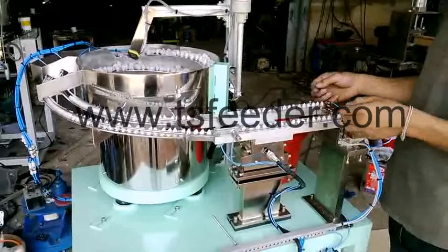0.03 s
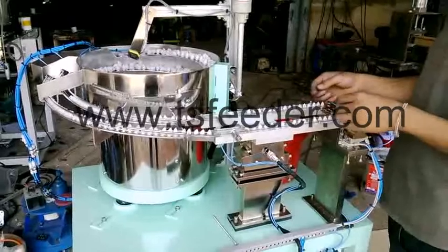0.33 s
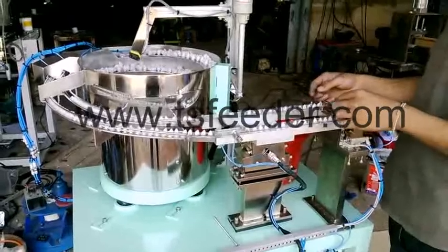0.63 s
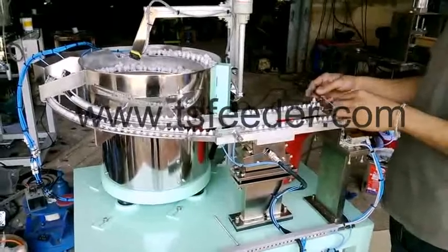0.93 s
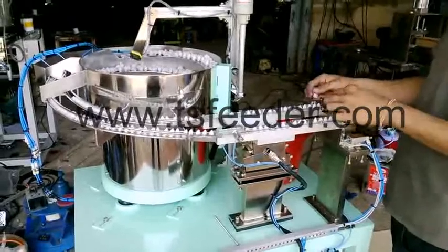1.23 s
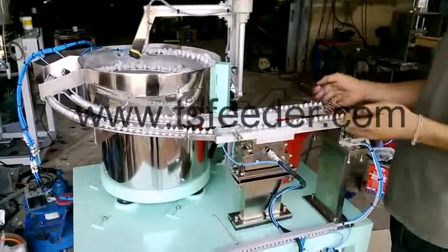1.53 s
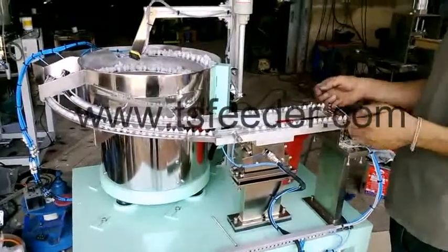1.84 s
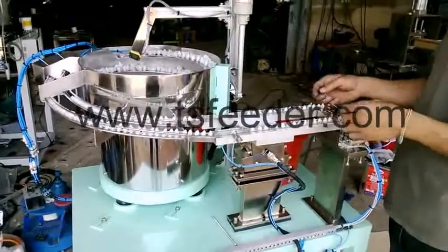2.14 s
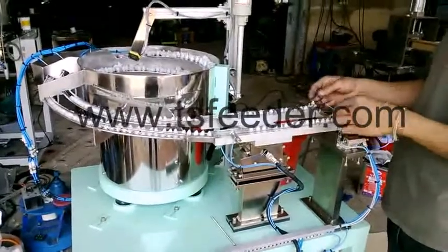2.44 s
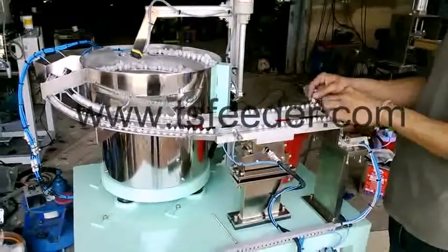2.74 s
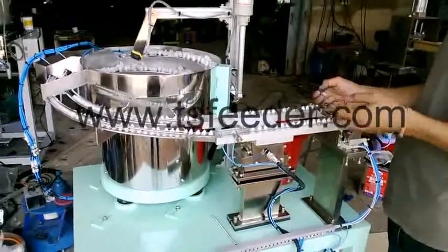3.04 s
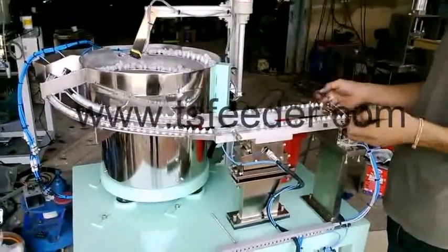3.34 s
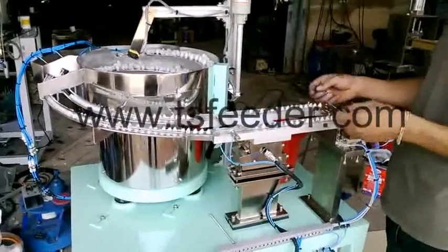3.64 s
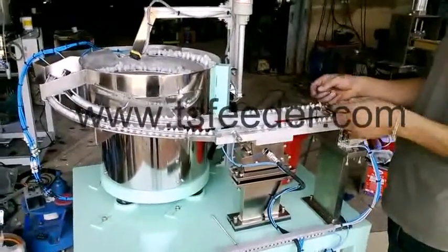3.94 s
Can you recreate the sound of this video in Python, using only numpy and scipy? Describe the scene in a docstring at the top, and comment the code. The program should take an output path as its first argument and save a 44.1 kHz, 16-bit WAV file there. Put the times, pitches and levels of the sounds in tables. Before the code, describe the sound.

A pneumatic feeder machine hisses and clacks nearby in a workshop. Sharp air bursts at 0.3 and 2.3 seconds each hiss briefly and end in a dull thud. The vibrating bowl buzzes with chattering parts from 0.4 to 1.7 and 2.5 to 3.3 seconds, each run ending in a puff, a steel clang and a light knock. Another burst comes at 3.9. A soft fluttering hiss and low rumble continue throughout.

```python
"""A vibratory bowl feeder runs twice, forced by its coil to buzz at twice the mains rate as parts chatter.
An air cylinder at the end of its track strokes out with a turbulent blast and a long hiss, thuds at its
stop, and later snaps back, exciting the modes of a steel slide with a clang.
A continuous air jet hisses, swelling and fluttering, over the low rumble of the workshop."""
import sys
import numpy as np
from scipy import signal
from scipy.fft import rfft, irfft
from scipy.io import wavfile

SR = 44100
rng = np.random.default_rng(int(sys.argv[2]) if len(sys.argv) > 2 else 0)


def bounce(signal):
    """Save signal as a 16-bit WAV file at the path given by the first command-line argument."""
    frames = np.transpose(np.atleast_2d(signal))
    limited = np.clip(frames, -1, 1)
    pcm = np.round(limited * 32767).astype(np.int16)
    wavfile.write(sys.argv[1], SR, pcm)


N = 176400
T = np.arange(N) / SR

# Feeder runs: on t/s, off t/s, level/dB
FEEDER_RUNS = [(0.395, 1.683, -4.5), (2.46, 3.33, -2)]
# Partials of the bowl: harmonic number, level/dB
BOWL_PARTIALS = [(1, -38.5), (2, -42.3), (3, -61), (4, -57), (5, -63), (21, -60), (23, -60), (25, -56),
                 (27, -54), (29, -52), (30, -59), (31, -60), (32, -49), (33, -49), (34, -58), (36, -55),
                 (37, -57), (45, -56)]
# Parts chattering on the track (every spectrum is a relative density): f/Hz, level/dB
CHATTER_SPECTRUM = [(150, -14), (350, 3.5), (800, -11), (1800, -6), (2400, -1.5), (3900, -1), (5200, -1),
                    (7000, -22), (10000, -57), (14000, -57)]

# Outward strokes: t/s, blast level/dB, hiss level/dB, thud level/dB
OUTWARD_STROKES = [(0.258, -22, -34.5, -28), (2.324, -21, -32.5, -27.5), (3.905, -18.5, -32.5, -30)]
# Click of the valve: f/Hz, level/dB
CLICK_SPECTRUM = [(150, -10), (900, 18), (2000, -19), (4000, 10), (12000, -33)]
# Air leaving the valve: f/Hz, level/dB
BLAST_SPECTRUM = [(200, -36), (500, -26), (1000, -19), (2000, -10), (3500, -5), (5000, -3.5), (7200, 3),
                  (8500, -4), (10000, -17.5), (11000, -22.5), (12500, -29), (14000, -40)]
# Resonances of the valve body: f/Hz, width/Hz, level/dB
VALVE_PEAKS = [(5650, 90, 5), (6830, 70, 7), (7030, 70, 9), (7515, 60, 8), (7843, 60, 7)]
# Exhaust hiss: f/Hz, level/dB
EXHAUST_SPECTRUM = [(300, -16), (1000, -25), (1600, -9.5), (2700, -6), (3600, -7.5), (4500, -2), (6500, -1),
                    (7600, -4), (9000, -11), (11000, -25), (12500, -30), (14000, -46)]
# Resonances and dips of the exhaust port: f/Hz, width/Hz, level/dB
PORT_PEAKS = [(2780, 120, 4), (4130, 90, -4), (4385, 80, 5), (4820, 90, -3), (5040, 80, 5.5), (5250, 60, 4),
              (5650, 80, 11), (6020, 70, 3), (7030, 60, 3), (7960, 100, -5)]
# Piston at its end stop: f/Hz, level/dB
THUD_SPECTRUM = [(40, -15), (120, -21), (180, 4), (280, -5.5), (400, -1), (560, -17.5), (720, -13),
                 (880, -17.5), (1160, -12.5), (1500, -29), (6000, -51)]
# Boom of the table under the piston: f/Hz, width/Hz, level/dB
TABLE_PEAKS = [(186, 32, 4.5)]

# Return strokes: t/s, blast level/dB, clang level/dB, hiss level/dB
RETURN_STROKES = [(1.637, -23, -18.5, -32), (3.2979, -23.5, -17.5, -28)]
# Blows of the slide as it rattles home: t/s after the first, level/dB
RATTLE_BLOWS = [(0, 0), (.0073, 0), (0.015, -7), (0.022, -16)]
# Crash of the slide: f/Hz, level/dB
CRASH_SPECTRUM = [(200, -14), (700, -10), (1100, -1), (1900, -9.5), (2700, 7.5), (3700, -2), (5200, 10.5),
                  (6500, 3), (8000, -36), (10500, -50), (14000, -51)]
# Pitch of the exhaust whistle: t/s from its onset, f/Hz
WHISTLE_PITCH = [(0, 8780), (.04, 8820), (.12, 9250), (.155, 9230), (.18, 8700), (.205, 7000)]
# Modes of the steel slide: f/Hz, level/dB, T60/s
STEEL_MODES = [(1055, -4, .16), (1152, -3.5, .16), (1660, -14, .13), (1865, -17, .2), (2130, -13, .18),
               (2245, -9.5, .21), (2623, -1, .22), (2680, -9, .12), (2845, -8, .15), (3300, -5, .14),
               (4322, -10, .17), (4960, -7, .16), (5515, -4, .2), (6040, -9, .22)]
# Knocks as the slide settles: t/s, level/dB
SETTLING_KNOCKS = [(1.9165, -32.5), (1.925, -32.5), (3.577, -28), (3.588, -31)]
# Scuff of a knock: f/Hz, level/dB
KNOCK_SPECTRUM = [(60, -4), (180, -0.5), (370, 2.5), (600, 0.5), (780, -5), (900, -10), (2600, -14),
                  (5000, -26), (12000, -55)]
# Hollow modes of the frame: f/Hz, level/dB, T60/s
FRAME_MODES = [(365, -15, 0.04), (505, -11, 0.043), (708, -16.5, 0.087)]
# Small parts tapping on the track: t/s, level/dB
PART_TAPS = [(3.579, -49), (3.598, -34.5)]
# Modes of those parts: f/Hz, level/dB, T60/s
PART_MODES = [(2280, -4, 0.054), (2780, -3, 0.043)]
# A faint metallic note: t/s, f/Hz, level/dB, decay time/s
FAINT_NOTE = (.11, 2085, -48, .12)

# Swells of the air jet: t/s, level/dB
JET_SWELLS = [(.1, -42.5), (.62, -40.5), (.86, -44.5), (.97, -37.5), (1.07, -43), (1.16, -40), (1.26, -44),
              (1.36, -40.5), (1.47, -43.5), (1.6, -39), (1.99, -38), (2.12, -44), (2.2, -36.5),
              (2.28, -38.5), (2.75, -39.5), (2.88, -38.5), (3.13, -41), (3.205, -31.5), (3.26, -37.5),
              (3.32, -32), (3.53, -35.5), (3.61, -39.5), (3.76, -34), (3.86, -40.5), (4, -26.5)]
# Hiss of the jet: f/Hz, level/dB
JET_SPECTRUM = [(500, -7), (1500, -7.5), (2300, -4), (3200, -2), (4400, 1), (5800, 3.5), (7500, -2.5),
                (9000, -10.5), (10000, -16), (11000, -28.5), (12500, -27), (14000, -47)]
# Wash of the workshop: f/Hz, level/dB
WASH_SPECTRUM = [(30, -2.5), (110, -2.5), (200, -8.5), (300, -9.5), (600, -19.5), (1200, -13.5),
                 (2200, -19), (5000, -14), (14000, -66)]
# Deep rumble: f/Hz, level/dB
RUMBLE_SPECTRUM = [(24, -9.5), (36, 3), (50, -9), (75, -4), (200, -20.5), (600, -72)]
# Swells of the rumble: t/s, level/dB
RUMBLE_SWELLS = [(.1, -45.5), (.7, -36), (1.2, -43), (2.2, -47.5), (2.8, -39), (3.3, -39.5), (4, -46.5)]
# Soft low bumps: t/s, level/dB
LOW_BUMPS = [(0.442, -23.5), (0.48, -19.5), (0.79, -25)]
# Scuff of a bump: f/Hz, level/dB
BUMP_SPECTRUM = [(15, 6), (35, -7), (62, 13), (110, -6.5), (190, -3), (400, -34), (2000, -67)]

CLANG_DELAY_S = 0.0104  # from the return blast to the slide's first blow


def feeder(coil_hz=120.9, spin_up_s=0.15, run_down_s=0.055, buzz_db=2, chatter_db=-40.5):
    """Forced vibration: the coil drives the bowl in harmonics, and the parts chatter once a cycle."""
    drive = sum(amp(db) * swell(on, spin_up_s, run_down_s, hold=off - on - spin_up_s)
                for on, off, db in FEEDER_RUNS)
    phase = 2 * np.pi * coil_hz * T
    buzz = np.zeros(N)
    for harmonic, db in BOWL_PARTIALS:
        waver = 1 + 0.15 * drift(36)
        buzz += amp(db) * waver * np.sin(harmonic * phase + 2 * np.pi * rng.random())
    chatter = unit(noise(CHATTER_SPECTRUM) * (1 + 0.3 * np.cos(phase)))
    return drive * (amp(buzz_db) * np.sqrt(2) * buzz + amp(chatter_db) * chatter)


def outward_strokes(opening_s=0.0038, travel_s=0.307, click_db=-25, rebound_s=0.034, rebound_db=-9.5):
    """Turbulence and impact: the valve clicks and vents, and air hisses until the piston thuds home."""
    click, blast = noise(CLICK_SPECTRUM), noise(BLAST_SPECTRUM, VALVE_PEAKS)
    hiss, thud = noise(EXHAUST_SPECTRUM, PORT_PEAKS), noise(THUD_SPECTRUM, TABLE_PEAKS)
    thud_rise_s, thud_fall_s = 0.012, 0.026
    out = np.zeros(N)
    for start, blast_db, hiss_db, thud_db in OUTWARD_STROKES:
        out += amp(click_db) * click * swell(start, rise=0.0013, fall=0.0011)
        out += amp(blast_db) * blast * swell(start, opening_s, fall=0.027)
        flow = swell(start, opening_s, fall=0.057, hold=travel_s)
        surge = 2.1 * swell(start, opening_s, fall=0.043)
        out += amp(hiss_db) * hiss * (flow + surge)
        stop = start + travel_s - thud_rise_s / 2
        impact = swell(stop, thud_rise_s, thud_fall_s)
        rebound = amp(rebound_db) * swell(stop + rebound_s, thud_rise_s, thud_fall_s)
        out += amp(thud_db) * thud * (impact + rebound)
    return out


def return_strokes(opening_s=0.00099, travel_s=0.22, whistle_delay_s=0.075):
    """Transient discharge: a puff of air, the slide's rattling crash, and a fading, whistling hiss."""
    blast, crash = noise(BLAST_SPECTRUM, VALVE_PEAKS), noise(CRASH_SPECTRUM)
    hiss = noise(EXHAUST_SPECTRUM, PORT_PEAKS)
    out = np.zeros(N)
    for start, blast_db, clang_db, hiss_db in RETURN_STROKES:
        out += amp(blast_db) * blast * swell(start, opening_s, fall=0.017)
        for lag, db in RATTLE_BLOWS:
            blow = swell(start + CLANG_DELAY_S + lag, rise=0.00058, fall=0.0048)
            out += amp(clang_db + db) * crash * blow
        cutoff = swell(start, opening_s, fall=0.014, hold=travel_s)
        out += amp(hiss_db) * hiss * swell(start, opening_s, fall=0.085) * cutoff
        out += whistle(start + whistle_delay_s)
    return out


def whistle(start, length_s=0.205, clean_s=0.075, level_db=-47, jitter_hz=60, rough_hz=380):
    """Flow tone: a thin exhaust whistle rises, breaks into turbulence, then drops as the pressure goes."""
    age = np.clip(T - start, 0, length_s)
    breakup = np.clip(age / clean_s - 1, 0, 0.5) * 2
    hz = np.interp(age, *np.transpose(WHISTLE_PITCH)) + (jitter_hz + rough_hz * breakup) * drift(700)
    phase = 2 * np.pi * np.cumsum(hz) / SR
    arch = abs(np.sin(np.pi * age / length_s)) ** 0.3
    return amp(level_db - 4 * breakup) * arch * np.sin(phase)


def slide(ring_db=-11.5, scuff_db=-11.5):
    """Impact excitation: the slide rings on each return, then settles with hollow knocks; parts tap."""
    strikes = [(start + CLANG_DELAY_S, clang_db + ring_db) for start, _, clang_db, _ in RETURN_STROKES]
    knocks = sum(amp(db) * swell(start, rise=0.0055, fall=0.03) for start, db in SETTLING_KNOCKS)
    scuff = amp(scuff_db) * noise(KNOCK_SPECTRUM) * knocks
    steel = ring(strikes, STEEL_MODES, rise=0.01)
    frame = ring(SETTLING_KNOCKS, FRAME_MODES, rise=0.01)
    parts = ring(PART_TAPS, PART_MODES, rise=0.00085)
    return steel + frame + scuff + parts


def ring(strikes, modes, rise, roughness=0.22):
    """Modal superposition: each mode of a struck part decays exponentially with a rough flutter."""
    out = np.zeros(N)
    for hz, db, t60 in modes:
        envelope = sum(amp(db + hit_db) * swell(start, rise, t60 / np.log(1000))
                       for start, hit_db in strikes)
        flutter = 1 + roughness * drift(170)
        out += np.sqrt(2) * envelope * flutter * np.sin(2 * np.pi * (hz * T + rng.random()))
    return out


def faint_note(jitter_hz=12):
    """Damped oscillation: a faint metallic note sounds before the first stroke."""
    start, hz, db, fall = FAINT_NOTE
    phase = 2 * np.pi * np.cumsum(hz + jitter_hz * drift(86)) / SR
    return amp(db) * swell(start, 0.019, fall) * np.sin(phase)


def air_jet(flutter_db=1.5):
    """Jet turbulence: a continuous broadband hiss swells and flutters."""
    hiss = early_reflections(noise(JET_SPECTRUM))
    level_db = np.interp(T, *np.transpose(JET_SWELLS)) + flutter_db * drift(16)
    return hiss * amp(level_db)


def workshop(wash_db=-48.5, bump_hz=56, scuff_db=-2.5):
    """Ambient noise: a broad wash and a deep rumble, with a few heavily damped low bumps."""
    scuff = amp(scuff_db) * noise(BUMP_SPECTRUM)
    bumps = np.zeros(N)
    for start, db in LOW_BUMPS:
        tone = np.sin(2 * np.pi * bump_hz * (T - start))
        bumps += amp(db) * swell(start, rise=0.0119, fall=0.014) * (scuff - tone)
    wash = amp(wash_db) * early_reflections(noise(WASH_SPECTRUM))
    rumble = noise(RUMBLE_SPECTRUM) * amp(np.interp(T, *np.transpose(RUMBLE_SWELLS)))
    return wash + rumble + bumps


def early_reflections(x, count=12, level_db=-11):
    """Comb filtering: echoes from the table and bowl, within 10 ms, give a hiss its hollow colour."""
    echoes = np.zeros(SR // 100)
    echoes[rng.integers(20, len(echoes), size=count)] = rng.choice([-1, 1], size=count)
    return unit(x + amp(level_db) * signal.fftconvolve(x, echoes / np.linalg.norm(echoes))[:N])


def room(x, t60_s=0.3, echoes_per_s=2000, level_db=-11):
    """Reverberation: sparse reflections die away exponentially."""
    t = T[:SR // 2]
    echoes = rng.standard_normal(len(t)) * (rng.random(len(t)) < echoes_per_s / SR)
    echoes *= (t > 0.003) * amp(-60 * t / t60_s)
    return amp(level_db) * signal.fftconvolve(x, echoes / np.linalg.norm(echoes))[:N]


def noise(spectrum, peaks=()):
    """Spectral shaping: noise of rms 1 with a broad contour and optional narrow peaks or dips."""
    hz = np.fft.rfftfreq(N, 1 / SR)
    knot_hz, knot_db = np.transpose(spectrum)
    db = np.interp(np.log(hz + 1), np.log(knot_hz), knot_db)
    for centre, width, lift in peaks:
        db += lift / (1 + (2 * (hz - centre) / width) ** 2)
    return unit(irfft(rfft(rng.standard_normal(N)) * amp(db), N))


def drift(bandwidth_hz):
    """Random modulation: low-pass noise of mean 0 and rms 1."""
    hz = np.fft.rfftfreq(N, 1 / SR)
    lowpass = np.exp(-(hz / bandwidth_hz) ** 2) * (hz > 0)
    return unit(irfft(rfft(rng.standard_normal(N)) * lowpass, N))


def swell(start, rise, fall, hold=0):
    """Exponential decay with time constant `fall`, after a linear rise and a hold; times in seconds."""
    return np.clip((T - start) / rise, 0, 1) * np.exp(-np.maximum(T - start - rise - hold, 0) / fall)


def amp(db):
    """Amplitude ratio of a level in decibels."""
    return 10 ** (np.asarray(db) / 20)


def unit(x):
    """Normalisation to rms 1."""
    return x / np.sqrt(np.mean(x ** 2) + 1e-20)


def scene():
    """Superposition: the feeder, the reverberant cylinder and the background add in one channel."""
    cylinder = outward_strokes() + return_strokes()
    machine = cylinder + room(cylinder) + slide() + faint_note() + feeder()
    return (machine + air_jet() + workshop())[None]


def record(dry, fade_start_s=0.076, fade_s=0.033, cutoff_hz=13900):
    """Band limiting: a low-pass filter follows a quick fade-in."""
    fade = np.clip((T - fade_start_s) / fade_s, 0, 1) ** 2
    lowpass = signal.firwin(401, cutoff_hz, window=("kaiser", 9), fs=SR)
    return signal.oaconvolve(dry * fade, lowpass[None], "same")


dry = scene()
out = record(dry)
bounce(out)
```